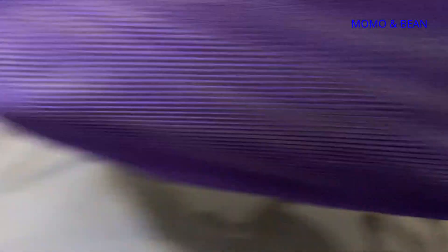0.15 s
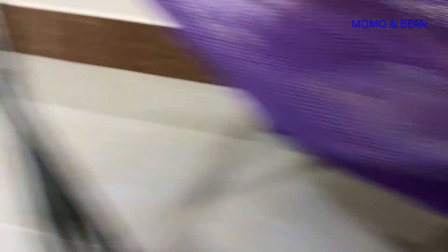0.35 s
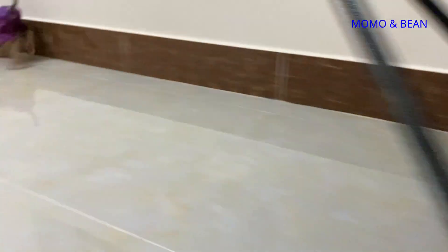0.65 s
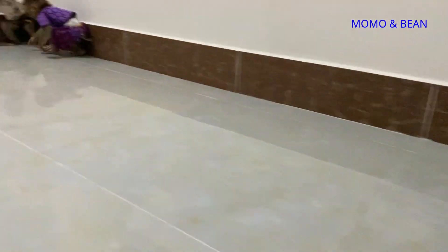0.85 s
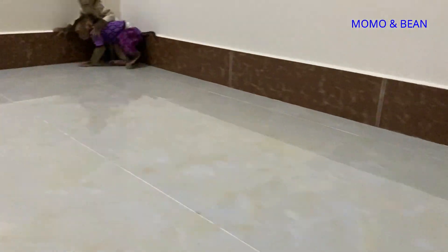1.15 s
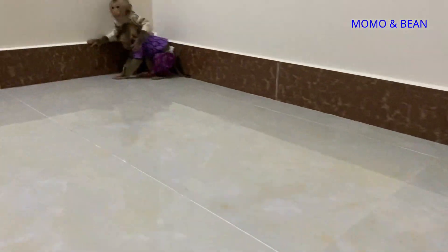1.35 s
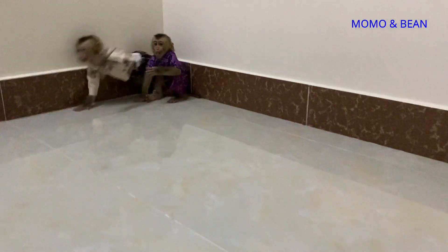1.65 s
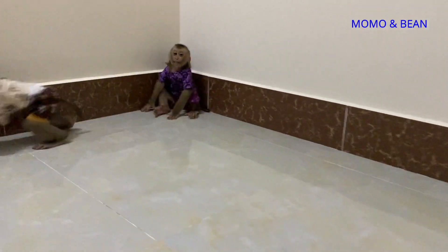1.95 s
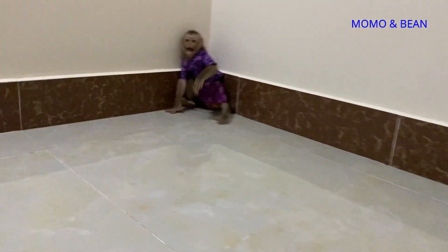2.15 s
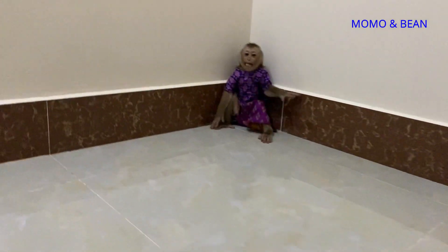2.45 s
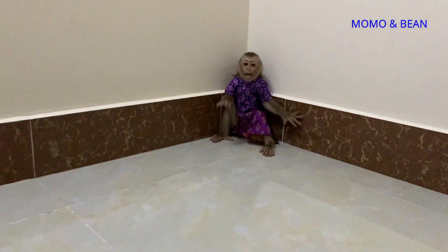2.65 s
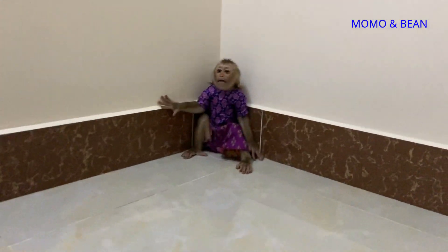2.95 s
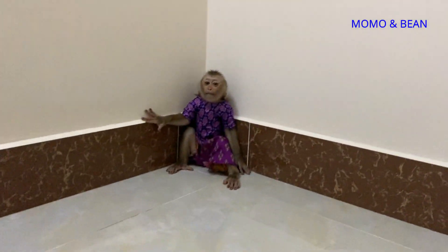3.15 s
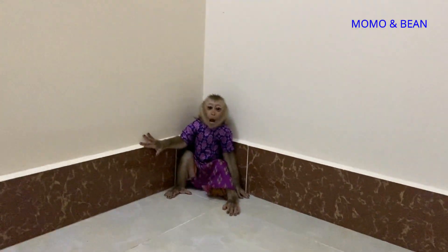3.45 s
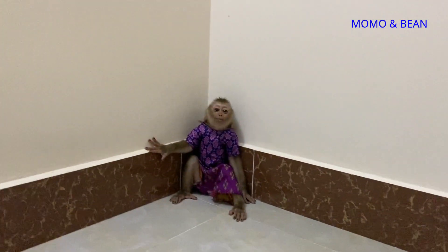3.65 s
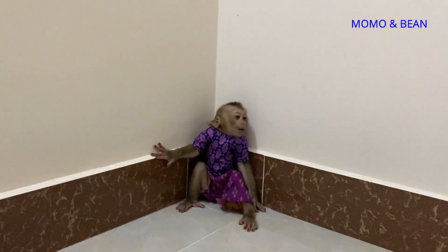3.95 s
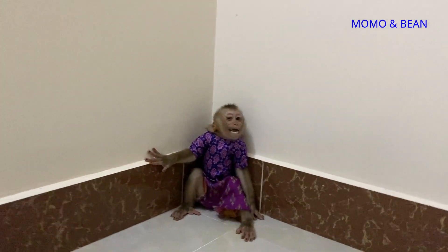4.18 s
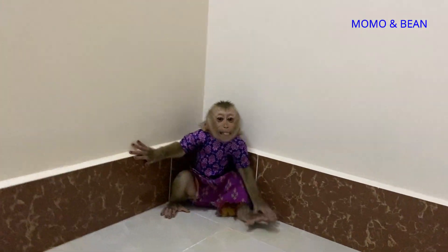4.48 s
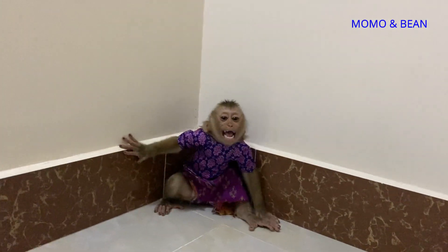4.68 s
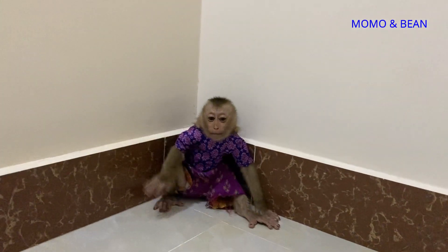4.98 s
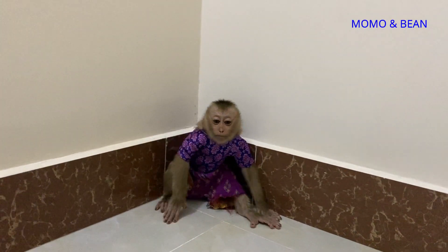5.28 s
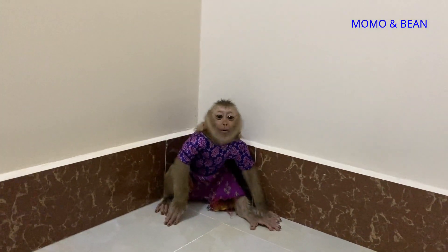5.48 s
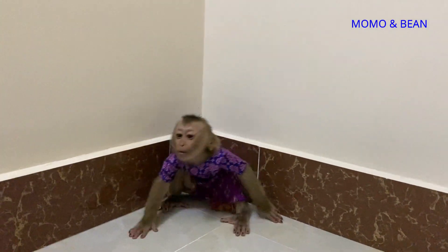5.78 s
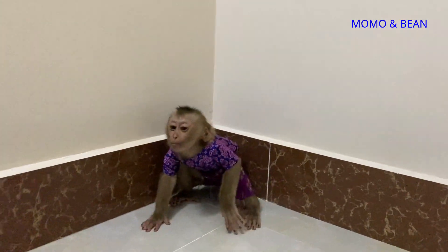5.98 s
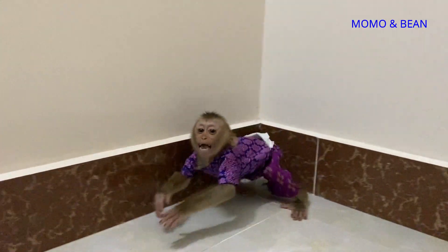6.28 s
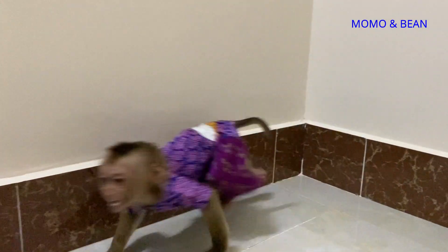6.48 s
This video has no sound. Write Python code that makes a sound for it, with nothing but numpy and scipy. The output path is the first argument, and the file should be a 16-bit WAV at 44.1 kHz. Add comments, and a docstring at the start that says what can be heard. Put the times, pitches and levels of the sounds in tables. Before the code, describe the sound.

A small, bare tiled room with faint, low, steady air, heard through a handheld camera. A weak cry remnant sounds at 0 s and a tiny tick at 0.1. From 0.28 to 0.6 s the camera body is knocked in a cluster of dull low thumps with rumble, and a thin squeak of swinging cloth at 0.4. Faint raspy cries follow at 0.55 and 0.82. A soft scuff and low shuffle come around 1.1-1.6, then a sharp tap on tile at 1.75. A small chirp at 1.85 leads to a strong shrill scream at 2.03, whistle cracking into rasp and high squeals. Further brief screams come at 2.35, 2.75, 4.15 and 4.6, each near 2-4 kHz, breaking hoarse and ringing under a second. Light scuffs touch 3.85 and 5.6, with a faint tick at 5.45. A final rising shriek bursts at 6.27, its echo running to the end.

```python
"""Baby monkey in a tiled room

A baby monkey screams in the corner of a bare tiled room: clean whistles break into rasps and high squeals.
The camera bumps past a squeaking hanging cloth, then moves closer with soft scuffs of filtered noise.
Small hands and feet tick on the tiles as short noise bursts, and the hard walls ring on after every cry.
The cries are sine waves and overtones that flutter and turn to noise, shaped by the throat."""
import sys
import numpy as np
from scipy import signal
from scipy.fft import rfft, irfft, next_fast_len
from scipy.io import wavfile

SR = 44100
rng = np.random.default_rng(int(sys.argv[2]) if len(sys.argv) > 2 else 0)


def materialize(psi):
    """Save the field psi as 16-bit PCM at rate SR to the path in sys.argv[1].

    A 1-D psi becomes a single channel; in a 2-D psi each row is a channel.
    """
    bounded = np.clip(np.atleast_2d(psi).T, -1, 1)
    quanta = np.round(bounded * 32767).astype(np.int16)
    wavfile.write(sys.argv[1], SR, quanta)


N = 292162  # length in samples
TOP_HZ = 15900  # upper limit of the sound

# The steady background air. Each row: frequency in Hz, level in dB.
AIR_SPECTRUM = [(20, -32), (38, -8.5), (55, 5.5), (110, -1.5), (220, -6), (450, -9.5), (1300, -11),
                (2200, -19), (5000, -28.5), (8000, -37.5), (11000, -33), (16000, -45.5)]
# How long the echoes ring. Each row: frequency in Hz, time to fall by 60 dB in seconds.
ROOM_DECAY = [(200, 0.36), (1500, 0.63), (3200, 0.82), (6500, 0.53), (10000, 0.39), (15000, 0.045)]
# How unlike the echoes are on the left and right. Each row: frequency in Hz, side against mid in dB.
ECHO_WIDTH = [(200, -8), (700, 3), (2000, -3), (5500, -6.5), (7000, -8.5), (9000, -17)]
# How far left and right are out of step. Each row: frequency in Hz, lead of the left in radians.
STEREO_PHASE = [(500, 0.5), (2000, 0.89), (3100, 0.57), (4200, 1.17), (5300, 1.23), (6100, 1.1),
                (7000, 0.5), (8950, -3), (11100, -6), (13300, -9.5), (15500, -12.5)]
# How directly the cries arrive. Each row: time in seconds, level of the direct path in dB.
DIRECT_PATH = [(0, -3), (0.9, -6), (1.9, -3.5), (2.03, 1), (6.3, -0.5)]

# The tone of a grip rumbling in the camera body. Each row: frequency in Hz, level in dB.
RUMBLE_SPECTRUM = [(20, -36.5), (35, -12), (58, 7.5), (100, -3.5), (175, -6.5), (240, -31.5), (320, -25.5),
                   (600, -41), (1200, -100)]
# Shifts of grip. Each row: time of the height in seconds, level in dB before the shared rumble level,
# length in seconds.
GRIP_SHIFTS = [(0.335, -16.5, 0.45), (0.523, -34, 0.39), (2.936, -56, 0.21), (3.157, -45.5, 0.43),
               (3.338, -45.5, 0.34), (5.803, -57, 7.4)]
# The tone of a dull shuffle. Each row: frequency in Hz, level in dB.
SHUFFLE_SPECTRUM = [(35, -30.5), (60, -8), (85, -13), (121, 2.5), (150, -4), (188, -0.5), (263, -21),
                    (400, -19.5), (520, -49), (880, -120)]
# The shuffle: start in seconds, length in seconds, level in dB before the shared shuffle level.
SHUFFLE_EVENT = (1.347, 0.3, -38.5)
# Bumps on the camera body. Each row: start in seconds, starting level in dB before the soft attack,
# settled pitch in Hz, time to fall by 60 dB in seconds.
CAMERA_BUMPS = [(0.279, -29.5, 341.4, 0.1), (0.299, -10, 151, 0.041), (0.327, -17.5, 99.4, 0.15),
                (0.357, -26, 148, 0.071), (0.433, -24.5, 89.7, 0.2), (0.466, -26, 59, 0.18),
                (0.519, -26, 66.9, 0.11), (0.584, -32.5, 70.6, 0.084)]
# The hanging cloth swings on its frame: start in seconds, length in seconds, level in dB.
CLOTH_SQUEAK = (0.407, 0.038, -56.5)

# Friction on the tiles. Each row: frequency in Hz, level in dB.
FRICTION_SPECTRUM = [(120, -31), (280, 2), (600, 2.5), (1150, 4), (1500, -4.5), (2000, -17), (4000, -49),
                     (9000, -52.5)]
# Scuffs on the floor. Each row: start in seconds, level in dB before the direct and room levels,
# length in seconds, pitch as a multiple of the friction spectrum, hiss in dB.
FLOOR_SCUFFS = [(1.13, -54.5, 0.056, .22, -36), (1.384, -47, 0.048, .9, -14.5),
                (3.854, -44.5, 0.1, 1.05, -30), (5.613, -48.5, 0.041, .85, -7.5),
                (6.21, -54.5, 0.086, .6, -39)]
# Taps on the tiles. Each row: start in seconds, peak in dB before the room is added, centre in Hz.
TILE_TAPS = [(0.125, -39.5, 10000), (1.4, -48, 6070), (1.608, -47, 8712), (1.743, -43, 2950),
             (1.758, -25.5, 3456), (3.851, -49.5, 5500), (5.442, -53.5, 10080)]

# What the throat and open mouth let through. Each row: frequency in Hz, level in dB.
THROAT_RESPONSE = [(600, -52.5), (1000, -19.5), (1350, -1.5), (2200, -5.5), (3700, 0), (5000, 6),
                   (7000, -4), (8500, -9.5), (10000, 2.5), (11000, 8.5), (13000, 4.5), (16000, -9.5)]
# Strength of the overtones and of the rasp at the larynx. Each row: frequency in Hz, level in dB.
LARYNX_SPECTRUM = [(1500, -4), (3800, -1.5), (5200, -7.5), (7200, 8.5), (8800, 11.5), (11000, -2),
                   (15000, 3.5)]
# The hoarse core of a broken cry. Each row: frequency in Hz, level in dB.
HOARSE_SPECTRUM = [(900, -36), (1400, -7), (2600, 12.5), (4200, -9.5), (5500, -5), (9000, -27)]
# Clean chirps that open a cry. Each row: start in seconds, length in seconds, level in dB before the throat,
# start pitch in Hz, end pitch in Hz, overtones against the fundamental in dB.
WHISTLE_CALLS = [ (1.84, 0.036, -30, 1120, 1543, -4.5), (2.039, 0.014, -11.5, 2433, 3000, -4),
                 (2.345, 0.015, -31, 4258, 3863, -21.5), (2.362, 0.02, -15, 4380, 3567, -19),
                 (2.751, 0.012, -21.5, 2177, 2467, -4.5), (4.143, 0.011, -28, 1812, 2032, -8),
                 (4.16, 0.011, -10, 1844, 1995, -10), (4.577, 0.014, -38.5, 3570, 3600, -25),
                 (4.595, 0.012, -18, 3593, 3403, -23), (6.258, 0.01245, -33.5, 1990, 2450, -1),
                 (6.277, 0.011, -16, 1808, 2480, 1)]
# Bursts in which the voice breaks. Each row: start in seconds, length in seconds, level in dB before the throat,
# start pitch in Hz, end pitch in Hz, mid-way overtones against the fundamental in dB, roughness from 0 to 1.
RASP_CALLS = [ (0.0, 0.025, -35, 1612, 1417, -23.5, 0.45), (0.537, 0.024, -36, 1780, 2107, 4, 0.29),
              (0.552, 0.08, -25, 2077, 2207, -5, 0.42), (0.819, 0.08, -28, 1950, 2120, -1.5, 0.56),
              (1.872, 0.0377, -31, 1540, 1544, -6, 0.21), (2.014, 0.016, -37.5, 1485, 1540, -0.5, 0.3),
              (2.029, 0.013, -22, 1649, 2197, 5.5, 0.27), (2.055, 0.018, -14.5, 3127, 2850, 5.5, 0.42),
              (2.069, 0.075, -23.5, 2627, 2707, 5, 0.5), (2.389, 0.026, -20.5, 2950, 2400, -4.5, 0.5),
              (2.417, 0.031, -22, 2400, 2000, -28, 0.62), (2.761, 0.028, -19, 2475, 2015, -1, 0.28),
              (2.787, 0.02, -34, 1991, 1950, -6, 0.26), (2.804, 0.034, -21.5, 2012, 2116, -16, 0.2),
              (4.173, 0.01543, -16.5, 2078, 2381, -12, 0.36), (4.187, 0.019, -21, 1958, 1750, 6, 0.7),
              (4.236, 0.025, -21, 2380, 2216, -4, 0.5), (4.259, 0.03, -18.5, 2230, 1866, -18, 0.46),
              (4.287, 0.056, -21, 2361, 2043, -12, 0.77), (4.618, 0.022, -17, 2907, 2008, -4, 0.55),
              (4.636, 0.033, -23, 1950, 1572, -2, 0.52), (4.667, 0.036, -21.5, 1604, 2154, -9.5, 0.68),
              (4.701, 0.016, -19.5, 3050, 3428, 0, 0.65), (6.289, 0.032, -20, 2988, 3126, 0.5, 0.48)]
# A second, higher voice that splits off. Each row: start in seconds, length in seconds,
# level in dB before the throat, start pitch in Hz, end pitch in Hz.
SQUEAL_CALLS = [ (0.83, 0.067, -39.5, 6288, 5702), (2.056, 0.015, -29, 3690, 3752),
                (2.076, 0.021, -23, 6400, 6690), (2.11, 0.03, -21, 7930, 6620),
                (2.172, 0.026, -34, 4300, 3600), (4.19, 0.014, -25, 3316, 3360),
                (4.298, 0.045, -29, 3707, 3870), (4.34, 0.012, -38.5, 4375, 4440),
                (4.701, 0.0157, -28.5, 6280, 6440), (6.291, 0.0077, -23, 4956, 5233),
                (6.301, 0.0112, -21, 4316, 4490), (6.313, 0.0072, -24.5, 5150, 5180)]

# The shape of each kind of sound: rise and 60 dB fade (as shares of its length), level change across it in dB.
# Whistles, rasps and squeals also have an arch: the mid-way bulge of the pitch, as a share.
SHUFFLE_CONTOUR = dict(rise=0.66, fade=3, tilt_db=-4)
SQUEAK_CONTOUR = dict(rise=0.93, fade=3.6, tilt_db=2)
WHISTLE_CONTOUR = dict(rise=0.55, fade=0.7, tilt_db=4, arch=0.03)
RASP_CONTOUR = dict(rise=0.24, fade=1.3, tilt_db=-3, arch=-0.03)
SQUEAL_CONTOUR = dict(rise=0.1, fade=0.96, tilt_db=-5.5, arch=0.005)
WHISTLE_ROUGH = 0.094  # from 0 to 1
RASP_DULLS_DB = 4.5  # the overtones sink by this much from the start of a rasp to its end


def amp(db):
    """Turn decibels into gain."""
    return 10 ** (np.asarray(db) / 20)


def unit(x):
    """Scale a sound to an average (rms) strength of 1."""
    return x / np.sqrt(np.mean(x ** 2) + 1e-20)


def along(points, hz):
    """Read a curve of (Hz, value) points on a logarithmic frequency axis."""
    f, v = np.transpose(points)
    return np.interp(np.log(hz + 1), np.log(f + 1), v)


def filtered(x, response):
    """Shape the frequencies of a sound with a response curve."""
    n = x.shape[-1]
    padded = next_fast_len(n + 4096)
    spectrum = rfft(x, padded) * response(np.fft.rfftfreq(padded, 1 / SR))
    return irfft(spectrum, padded)[..., :n]


def noise(response):
    """Make coloured noise with an average (rms) strength of 1."""
    return unit(filtered(rng.standard_normal(N), response))


def wide(spectrum, side_db):
    """Make stereo noise from a shared middle and an opposite side part."""
    mid, side = (noise(lambda hz: amp(along(spectrum, hz))) for _ in range(2))
    return np.array([mid + amp(side_db) * side, mid - amp(side_db) * side])


def resonance(hz, centre_hz, q):
    """Let a band around the centre ring, as a small resonator does; a higher q is narrower."""
    damping = 1j * hz * centre_hz / q
    return damping / (centre_hz ** 2 - hz ** 2 + damping)


def blend(a, b, share):
    """Mix two sounds at constant power."""
    share = np.clip(share, 0, 1)
    return np.sqrt(1 - share) * a + np.sqrt(share) * b


def envelope(s, length, db, rise, fade, tilt_db):
    """Gain over time: a smooth rise, a level that swells or sags, and a fade."""
    u = np.maximum(np.arange(N) / SR - s, 0) / length  # time as a share of the length
    onset = np.sin(np.pi / 2 * np.minimum(u / rise, 1)) ** 2
    tilt = tilt_db * (np.minimum(u, 1) - .5)
    fall = 60 * np.clip((u - 1) / fade, 0, 2)
    return onset * amp(db + tilt - fall)


def air(level_db):
    """The still air of the place is steady, wide noise."""
    return amp(level_db) * wide(AIR_SPECTRUM, side_db=-4.5)


def room(x, build=0.0041, linger=.13, treble_db=-2):
    """Echoes between the tiled walls thicken, linger, then die away, the high treble first."""
    hz, t, z = signal.stft(rng.standard_normal((2, int(1.3 * SR))), SR, nperseg=256)
    age = np.hypot(t, linger) - linger  # grows slowly at first, so the echoes linger
    decay = amp(-60 * age / along(ROOM_DECAY, hz)[:, None])
    tail = signal.istft(z * decay * (1 - np.exp(-t / build)), SR, nperseg=256)[1]
    tail = filtered(tail, lambda f: amp(along([(4000, 0.015), (11000, treble_db)], f)))
    mid, side = tail / np.linalg.norm(tail[0])
    side = filtered(side, lambda f: amp(along(ECHO_WIDTH, f)))
    return signal.fftconvolve(x[None], np.array([mid + side, mid - side]), axes=1)[:, :N]


def out_of_step(x):
    """Turn left and right out of step by frequency, for cries, floor sounds and echoes alike."""
    sides = np.array([[1], [-1]])
    return filtered(x, lambda hz: np.exp(.5j * sides * along(STEREO_PHASE, hz)))


def grips(rumble_db=-8, swell_db=32):
    """Each shift of grip swells and ebbs as a rumble in the camera body."""
    t = np.arange(N) / SR
    swells = 0
    for s, db, length in GRIP_SHIFTS:
        swells = swells + amp(db - swell_db * 2 * np.abs(t - s) / length)
    return amp(rumble_db) * swells * wide(RUMBLE_SPECTRUM, side_db=-9.0)


def shuffle(shuffle_db=-2):
    """A dull shuffle booms in the room as low noise."""
    gain = envelope(*SHUFFLE_EVENT, **SHUFFLE_CONTOUR)
    return amp(shuffle_db) * gain * wide(SHUFFLE_SPECTRUM, side_db=-11)


def bumps(bend=0.7, settle=0.0046, attack=0.001):
    """Each knock on the camera is a short low boom whose pitch sags as the contact relaxes."""
    out, t = np.zeros(N + SR), np.arange(SR // 4) / SR
    for s, db, hz, t60 in CAMERA_BUMPS:
        cycles = hz * (t + bend * settle * (1 - np.exp(-t / settle)))
        boom = amp(db - 60 * t / t60) * np.sin(2 * np.pi * cycles) * (1 - np.exp(-t / attack))
        out[round(s * SR):][:len(t)] -= boom
    return out[:N]


def squeak(centre_hz=7150, q=14):
    """The swinging cloth gives a thin squeak: noise in a narrow band."""
    return envelope(*CLOTH_SQUEAK, **SQUEAK_CONTOUR) * noise(lambda hz: resonance(hz, centre_hz, q) ** 2)


def scuffs(rise=0.013, t60=0.68):
    """Something soft slides over the tiles: a hollow band of friction noise with some hiss."""
    out, t = np.zeros(N + SR), np.arange(SR // 2) / SR
    for s, db, length, pitch, hiss_db in FLOOR_SCUFFS:
        def surface(hz):
            hiss = amp(hiss_db) / (1 + (hz / 7000) ** 2)
            return amp(along(FRICTION_SPECTRUM, hz / pitch)) + hiss

        rub = unit(filtered(rng.standard_normal(len(t)), surface))
        fall = 60 * np.maximum(t - length, 0) / t60
        out[round(s * SR):][:len(t)] += rub * (1 - np.exp(-t / rise)) * amp(db - fall)
    return out[:N]


def taps(t60=0.0073, q=2.2):
    """Nails and palms tick on the hard floor: fast-fading noise through a resonance."""
    out, t = np.zeros(N + SR), np.arange(SR // 10) / SR
    for s, db, centre_hz in TILE_TAPS:
        burst = rng.standard_normal(len(t)) * amp(-60 * t / t60)
        tick = filtered(burst, lambda hz: resonance(hz, centre_hz, q))
        out[round(s * SR):][:len(t)] += amp(db) * tick / np.max(np.abs(tick))
    return out[:N]


def flutter(width_hz):
    """The vocal folds are chaotically unsteady: slow noise, quicker with a larger width."""
    return noise(lambda hz: 1 / (1 + (hz / width_hz) ** 2))


def controls(calls, arch, **shape):
    """Gain, pitch, progress 0-1 and further columns per sample; each call is one arched glide."""
    t, rows = np.arange(N) / SR, np.array(calls)
    gain = sum(envelope(s, length, db, **shape) for s, length, db, *_ in calls)
    latest = np.maximum(np.searchsorted(rows[:, 0], t) - 1, 0)  # the most recently started call
    s, length, _, start_hz, end_hz, *others = rows[latest].T
    progress = np.clip((t - s) / length, 0, 1)
    glide = start_hz * (end_hz / start_hz) ** progress
    pitch = glide * (1 + arch * np.sin(np.pi * progress))
    return gain, pitch, progress, *others


def scream(loudness, pitch, rough, bright_db, jitter=0.19, jitter_hz=420, rasp=2.2, chaos=0.92,
           break_point=0.45, waver=.007, waver_hz=70, rolloff_db=6):
    """Vocal folds whistle at the pitch; driven hard they flutter and the overtones smear into a rasp."""
    rough = np.clip(rough, 0, 1)
    wobble = waver * flutter(waver_hz) + jitter * rough * flutter(jitter_hz)
    phase = 2 * np.pi * np.cumsum(pitch * (1 + wobble)) / SR
    on = loudness > amp(-80)  # overtones are computed only where the voice sounds
    orders = np.arange(2, 10)[:, None]
    overtone_hz = orders * pitch[on]
    weights = amp(along(LARYNX_SPECTRUM, overtone_hz)) * (overtone_hz < TOP_HZ)
    weights = weights * amp(-rolloff_db * np.maximum(orders - 4, 0))
    offsets = rng.uniform(0, 2 * np.pi, orders.shape)
    waves = np.sum(weights * np.sin(orders * phase[on] + offsets), axis=0)
    overtones = np.zeros(N)
    overtones[on] = np.sqrt(2) * waves / np.linalg.norm(weights, axis=0)
    # as the folds lose their rhythm, the whistle turns hoarse and the overtones turn to hiss
    broken = np.clip(chaos * (rough - break_point), 0, 1)
    hoarse = noise(lambda hz: amp(along(HOARSE_SPECTRUM, hz)))
    hiss = noise(lambda hz: amp(along(LARYNX_SPECTRUM, hz)))
    core = blend(np.sqrt(2) * np.sin(phase), hoarse, broken)
    upper = blend(overtones, hiss, rasp * rough ** 2)
    folds = blend(core, upper, 1 / (1 + amp(-2 * bright_db)))
    return loudness * folds * (1 + .35 * rough * flutter(jitter_hz))


def whistles():
    """A cry opens with a short, clean chirp that swells and cuts off."""
    loudness, pitch, _, bright_db = controls(WHISTLE_CALLS, **WHISTLE_CONTOUR)
    return scream(loudness, pitch, WHISTLE_ROUGH, bright_db)


def rasps(tremble_db=-1.0, tremble_hz=60):
    """The voice breaks: a trembling burst that starts shrill, then weakens and dulls."""
    loudness, pitch, progress, bright_db, rough = controls(RASP_CALLS, **RASP_CONTOUR)
    trembling = loudness * amp(tremble_db * flutter(tremble_hz))
    return scream(trembling, pitch, rough, bright_db - RASP_DULLS_DB * (progress - .5))


def squeals(jitter=0.059, jitter_hz=300):
    """A second, independent vibration of the folds: a jittery sine wave."""
    loudness, pitch, _ = controls(SQUEAL_CALLS, **SQUEAL_CONTOUR)
    cycles = np.cumsum(pitch * (1 + jitter * flutter(jitter_hz))) / SR
    return loudness * np.sqrt(2) * np.sin(2 * np.pi * cycles)


def monkey():
    """Whistles, rasps and squeals all pass through the throat, which favours some frequencies."""
    return filtered(whistles() + rasps() + squeals(), lambda hz: amp(along(THROAT_RESPONSE, hz)))


def scene(cry_room_db=-5.5, floor_room_db=-6, scuff_direct_db=-6, air_db=-61, left_db=0.0):
    """Cries, cloth and floor sounds fill the room; bumps, handling and air are added without echoes."""
    cries, slides, ticks = monkey(), scuffs(), taps() + squeak()
    nearness = amp(np.interp(np.arange(N) / SR, *np.transpose(DIRECT_PATH)))
    direct = cries * nearness + ticks + amp(scuff_direct_db) * slides
    direct = amp([[left_db], [-left_db]]) * direct
    echoes = room(amp(cry_room_db) * cries + amp(floor_room_db) * (slides + ticks))
    return out_of_step(direct + echoes) + bumps() + grips() + shuffle() + air(air_db)


def record(dry):
    """The camera keeps nothing above its band limit; the edge is a 300 Hz slope."""
    return filtered(dry, lambda hz: np.clip((TOP_HZ - hz) / 300 + .5, 0, 1))


dry = scene()
out = record(dry)
materialize(out)
```